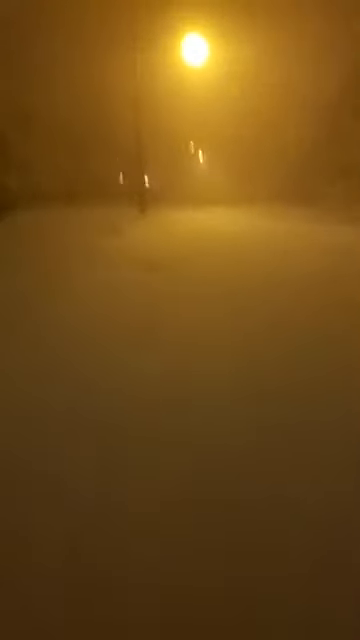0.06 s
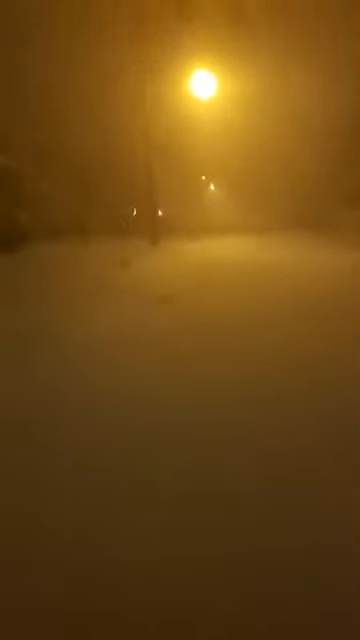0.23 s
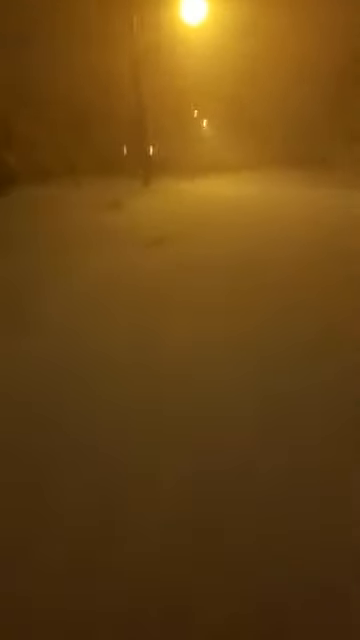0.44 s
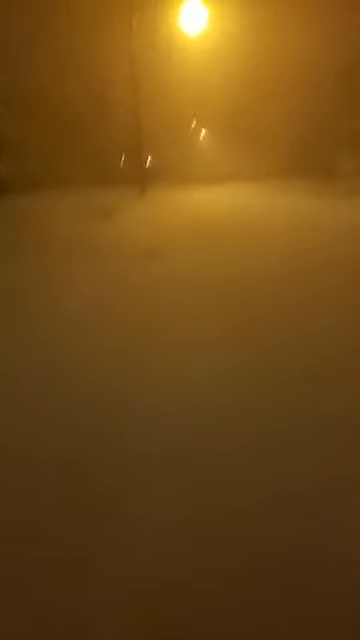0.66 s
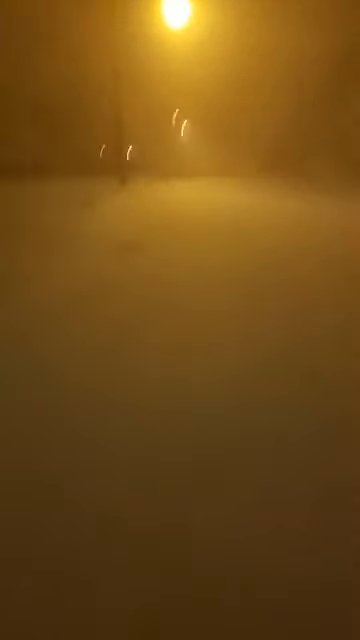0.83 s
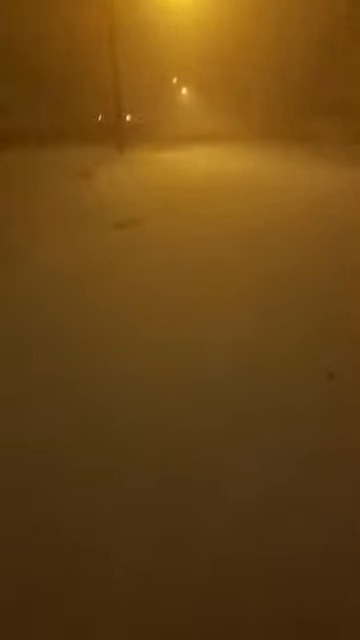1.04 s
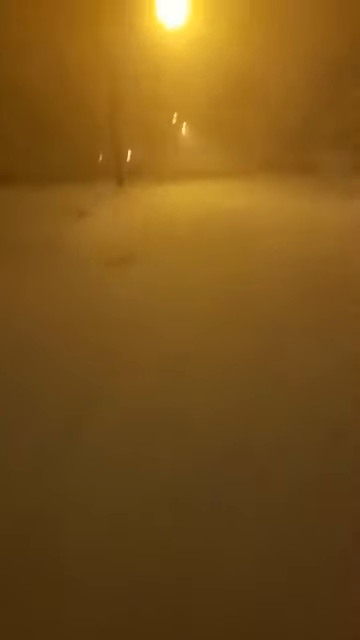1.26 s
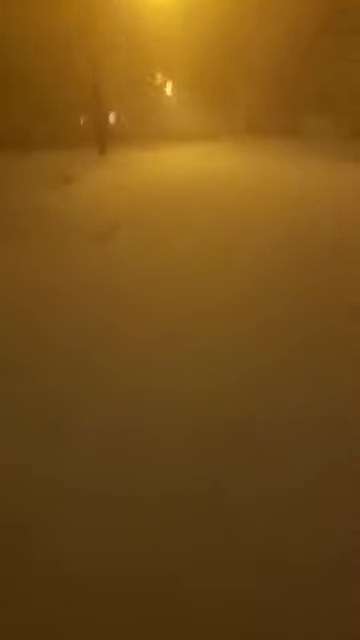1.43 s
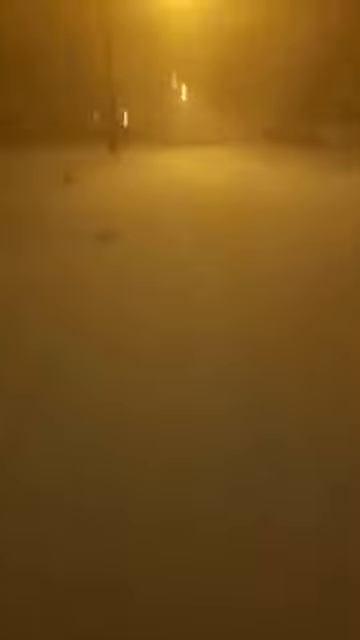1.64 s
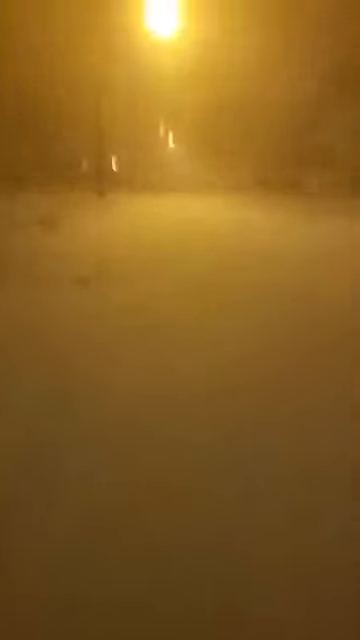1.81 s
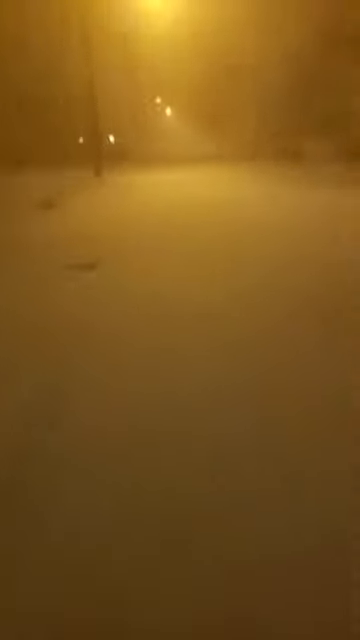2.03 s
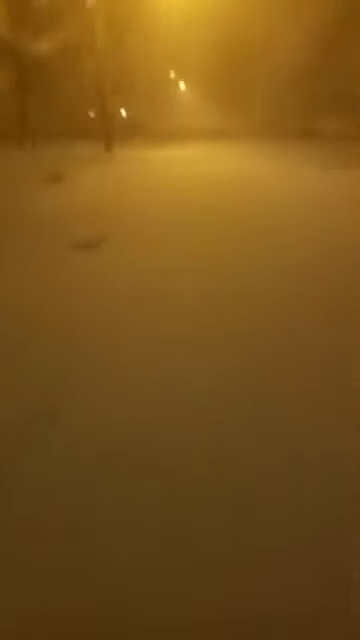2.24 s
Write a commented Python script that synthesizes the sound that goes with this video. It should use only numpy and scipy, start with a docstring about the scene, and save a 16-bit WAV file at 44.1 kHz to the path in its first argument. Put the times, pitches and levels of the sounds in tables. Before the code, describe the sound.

Strong blizzard wind roars and flutters against a hand-held microphone, swelling, easing and swelling again

```python
"""A fluttering roar of blizzard wind on a hand-held microphone, over a deep rumble from large eddies.
The roar is bands of noise that follow the wind force; head-on gusts and short puffs lift its treble,
most of all in the first gust. Big eddies thump the port as brief swings of pressure.
Behind it coloured noise makes the far storm's rush and the hiss of dry snow, with grains in it;
a thin airy whistle comes in the first lull, and a few coarser grains tick on the housing."""
import sys
import numpy as np
from scipy import signal
from scipy.fft import rfft, irfft
from scipy.io import wavfile

SR = 44100
rng = np.random.default_rng(int(sys.argv[2]) if len(sys.argv) > 2 else 0)


def dump_mix(stems):
    """Bounce the given channels to the path in sys.argv[1] as a 16-bit WAV at rate SR."""
    frames = np.atleast_2d(stems).T  # one column per channel
    limited = np.clip(frames, -1, 1)  # hard clip at full scale
    pcm = np.round(limited * 32767).astype(np.int16)
    wavfile.write(sys.argv[1], SR, pcm)


N = 100503  # length in samples


def undb(db):
    """Decibels to gain."""
    return 10 ** (np.asarray(db) / 20)


def unit(x):
    """Scale to rms 1."""
    return x / np.sqrt(np.mean(x ** 2))


def curve(rows):
    """Join (time_s, value) rows by straight lines, one value per sample."""
    times, values = np.array(rows).T
    return np.interp(np.arange(N) / SR, times, values)


def frequencies():
    """Spectrum frequencies in Hz, held above zero so that they have a logarithm."""
    return np.maximum(np.fft.rfftfreq(N, 1 / SR), 1)


def colour(x, points):
    """Filter by (freq_hz, relative_db) points, 90 dB down outside them; rms 1."""
    hz, db = np.array(points).T
    response_db = np.interp(np.log(frequencies()), np.log(hz), db, left=-90, right=-90)
    return unit(irfft(rfft(x) * undb(response_db), N))


def band(hz, octaves):
    """Noise in a bell around hz, octaves wide to each side; rms 1."""
    bell = np.exp(-.5 * (np.log2(frequencies() / hz) / octaves) ** 2)
    return unit(irfft(rfft(rng.standard_normal(N)) * bell, N))


def even(x, share):
    """Flatten part of a noise's chance swells, so that it follows the wind more closely; rms 1."""
    envelope = np.abs(signal.hilbert(x))
    return unit(x / (envelope + .2) ** share)


def walk(rate):
    """Smooth chance with about rate turns a second; rms 1."""
    f = np.fft.rfftfreq(N, 1 / SR)
    slow = np.exp(-2 * (f / rate) ** 2) * (f > 0)  # no constant offset
    return unit(irfft(rfft(rng.standard_normal(N)) * slow, N))


def storm():
    """The distant rush is coloured noise that swells and sinks slowly."""
    # far storm colour: freq_hz, relative_db per Hz
    storm_colour = [(400, -2.5), (900, 6.5), (1400, 5.5), (1900, 4.5), (2600, -4), (3200, -10.5),
                    (4500, -12)]
    # far storm level: time_s, level_db before the trim
    storm_level = [(0, -69.5), (.4, -77), (.72, -73.5), (.85, -82.5), (1.05, -70.5), (1.3, -86),
                   (1.38, -78), (1.5, -77), (1.77, -69), (1.88, -79.5), (2.05, -71.5), (2.28, -75)]
    trim_db, swell_db = 12.5, -0.8
    level_db = curve(storm_level) + trim_db + swell_db * walk(20)
    return colour(rng.standard_normal(N), storm_colour) * undb(level_db)


def snow():
    """Blown snow is a fine hiss of noise with single random grains in it."""
    # snow level: time_s, level_db before the trim
    hiss_level = [(0, -65.5), (.12, -63.5), (.29, -67), (.42, -66), (.5, -69), (.68, -63), (.84, -67.5),
                  (.93, -65.5), (1.02, -68), (1.14, -63), (1.22, -65), (1.29, -58.5), (1.34, -69),
                  (1.49, -63.5), (1.55, -64.5), (1.64, -62.5), (1.94, -67), (2.015, -60.5), (2.05, -64),
                  (2.085, -60.5), (2.16, -63.5), (2.28, -65.5)]
    # snow colour: freq_hz, relative_db per Hz
    hiss_colour = [(2000, 6), (3300, -6.5), (4600, -0.5), (7000, -4), (8600, -10), (10200, -6.5),
                   (12000, 0), (14200, -2)]
    trim_db, grains_per_s = -1.5, 1400
    grain_db, grain_spread_db = -1, 3.5  # grain level against the hiss, spread of grain strengths
    hit = rng.random(N) < grains_per_s / SR
    strength_db = grain_spread_db * np.minimum(rng.exponential(size=N), 5)
    grains = hit * rng.choice([-1, 1], N) * undb(strength_db)
    hiss = colour(rng.standard_normal(N), hiss_colour)
    mixed = hiss + undb(grain_db) * colour(grains, hiss_colour)
    return mixed * undb(curve(hiss_level) + trim_db)


def whistle(t):
    """A narrow band of rushing air comes and goes in the first lull."""
    peak_s, half_s = .42, 0.13
    centre_hz, octaves, level_db = 2610, 0.15, -68
    swell = np.exp(-((t - peak_s) / half_s) ** 2)
    return band(centre_hz, octaves) * undb(level_db) * swell


def ticks(t):
    """Coarser grains strike the housing: bursts of band noise that start at once and die at once."""
    # grains on the housing: start_s, centre_hz, level_db before halving
    tick_rows = [(.6764, 2000, -43), (.879, 12500, -48), (1.295, 9800, -45), (1.612, 7500, -48),
                 (1.6836, 1900, -38), (2.011, 6000, -46), (2.081, 4700, -43), (2.138, 2000, -32)]
    decay_s, octaves = 0.0015, .4
    out = 0
    for start, hz, db in tick_rows:
        strike = (t >= start) * np.exp(-np.abs(t - start) / decay_s)
        out = out + band(hz, octaves) * undb(db) / 2 * strike
    return out


def thumps(t):
    """A big eddy passes the port as a brief push and pull of pressure."""
    # big eddies: centre_s, pitch_hz, level_db of the sine before its envelope
    thump_rows = [(.123, 143, -17.5), (.185, 139, -14), (1.027, 137, -23), (1.585, 165, -9.5),
                  (1.97, 305, -24), (2.145, 108, -15)]
    half_cycles = .9  # half length of the envelope
    out = 0
    for when, hz, db in thump_rows:
        cycles = (t - when) * hz
        # the minus sign puts the push ahead of the pull
        out = out - undb(db) * np.sin(2 * np.pi * cycles) * np.exp(-(cycles / half_cycles) ** 2)
    return out


def rumble():
    """Large slow eddies push on the diaphragm: low noise that follows their strength."""
    # strength of the large eddies: time_s, level_db before the trim
    rumble_level = [(0, -33.5), (.06, -26.5), (.11, -17.5), (.195, -21), (.32, -31), (.52, -30.5),
                    (.6, -44), (.645, -27), (.7, -31), (.76, -25), (.9, -26), (.96, -32), (1.025, -17),
                    (1.09, -33.5), (1.125, -27.5), (1.19, -34), (1.26, -32.5), (1.33, -32), (1.37, -41),
                    (1.445, -23.5), (1.515, -20), (1.55, -30), (1.585, -14), (1.62, -24.5), (1.665, -18),
                    (1.78, -31.5), (1.85, -24.5), (1.9, -28), (1.97, -15.5), (2.04, -27), (2.08, -19.5),
                    (2.12, -22.5), (2.16, -18.5), (2.28, -31.5)]
    # rumble colour: freq_hz, relative_db per Hz
    rumble_colour = [(18, -62), (30, -12), (50, -4), (90, -5), (125, -7.5), (180, -12.5), (300, -28.5)]
    trim_db, evenness = -1, 0.45
    eddies = even(colour(rng.standard_normal(N), rumble_colour), evenness)
    return eddies * undb(curve(rumble_level) + trim_db)


def head_on_gusts(t):
    """Head-on gusts tear at the port: treble lift in dB that rises and falls around each peak."""
    # gusts: peak_s, rise_s, fall_s, lift_db
    tear_rows = [(0.123, 0.15, 0.14, 26.5), (2.08, 0.095, 0.069, 5)]
    lift_db = 0
    for peak, rise, fall, extra in tear_rows:
        side_s = np.where(t < peak, rise, fall)
        lift_db = lift_db + extra * np.exp(-((t - peak) / side_s) ** 2)
    return lift_db


def puffs(t):
    """Short puffs strike the port squarely: brief lifts in dB, or a dip where the value is negative."""
    # puffs: centre_s, half_length_s, lift_db
    puff_rows = [(0.295, 0.013, -7), (0.564, 0.0074, 18.5), (0.595, 0.0032, 11), (0.67, 0.011, 18),
                 (0.713, 0.0062, 22.5), (0.874, 0.0055, 15.5), (1.186, 0.015, 17.5), (1.957, 0.0082, 11),
                 (2.073, 0.016, 9.5), (2.219, 0.0042, 9)]
    lift_db = 0
    for when, half, extra in puff_rows:
        lift_db = lift_db + extra * np.exp(-((t - when) / half) ** 2)
    return lift_db


def roar(t):
    """Smaller eddies come in shared bursts; each size grows with the wind force at its own rate."""
    # wind force at the port: time_s, force_db
    force_curve = [(0.0, -24.5), (0.025, -77), (0.055, -29), (0.115, -22), (0.2, -26), (0.235, -25.5),
                   (0.305, -28.5), (0.34, -54), (0.41, -32), (0.47, -58.5), (0.63, -40), (0.695, -41),
                   (0.715, -33), (0.74, -34.5), (0.835, -34.6), (0.945, -54), (0.965, -38), (1.03, -27),
                   (1.045, -36.5), (1.075, -36), (1.095, -47), (1.115, -33.5), (1.15, -44), (1.16, -45),
                   (1.19, -47.5), (1.23, -52), (1.265, -33.5), (1.335, -61), (1.375, -40), (1.4, -53),
                   (1.42, -33.5), (1.475, -18.5), (1.495, -26), (1.6, -25.5), (1.625, -51), (1.64, -23),
                   (1.685, -29.5), (1.715, -46.5), (1.805, -54.5), (1.84, -27.5), (1.865, -23.5),
                   (1.88, -38), (1.925, -23.6), (2.01, -23), (2.045, -34), (2.07, -24.5), (2.08, -23),
                   (2.12, -24.5), (2.155, -26.5), (2.175, -26), (2.19, -23.5), (2.23, -28), (2.25, -23.5),
                   (2.275, -37)]
    # roar at the usual force: freq_hz, half_octave_band_level_db, growth in dB per dB of force
    roar_bands = [(140, -42.5, 1.14), (202, -33, 0.6758), (370, -35, 1.0), (676, -46, 1),
                  (1019, -60, 1.0769), (1481, -68.5, 0.84), (2315, -85, 1.0), (4700, -105.5, 1.0)]
    usual_force_db, evenness = -30, 0.7
    flutter_per_s, flutter_db = 253, 3  # shared by all bands
    flicker_db = 3.3  # separate in each band
    tear_from_hz, tear_full_hz = 320, 1720
    puff_from_hz, puff_full_hz = 350, 830

    hz, level_db, growth = np.array(roar_bands).T
    force_db = curve(force_curve) - usual_force_db + flutter_db * walk(flutter_per_s)
    tear_db, puff_db = head_on_gusts(t), puffs(t)

    def at(f, points_hz, values):
        """Read a value at f along a logarithmic frequency axis."""
        return np.interp(np.log(f), np.log(points_hz), values)

    out = 0
    for f in 140 * 2 ** np.arange(0, 5.1, .5):  # half-octave steps over five octaves
        tear_share = at(f, [tear_from_hz, tear_full_hz], [0, 1])
        puff_share = at(f, [puff_from_hz, puff_full_hz], [0, 1])
        lift_db = tear_db * tear_share + puff_db * puff_share
        eddies = even(band(f, 1 / 4), evenness)
        flicker = flicker_db * walk(f / 4)  # smaller eddies flicker faster
        band_db = at(f, hz, level_db) + at(f, hz, growth) * force_db + lift_db + flicker
        out = out + eddies * undb(band_db)
    return out


def scene():
    """Wind on the port over storm and snow, in mono."""
    t = np.arange(N) / SR
    background = storm() + snow() + whistle(t) + ticks(t)
    wind = thumps(t) + rumble() + roar(t)
    return (background + wind)[None]


def record(dry):
    """The recorder cuts the top with a steep low-pass."""
    top_hz = 14300
    low_pass = signal.ellip(10, .2, 70, top_hz, fs=SR, output="sos")  # .2 dB ripple, 70 dB stop
    return signal.sosfilt(low_pass, dry)


dry = scene()
out = record(dry)
dump_mix(out)
```